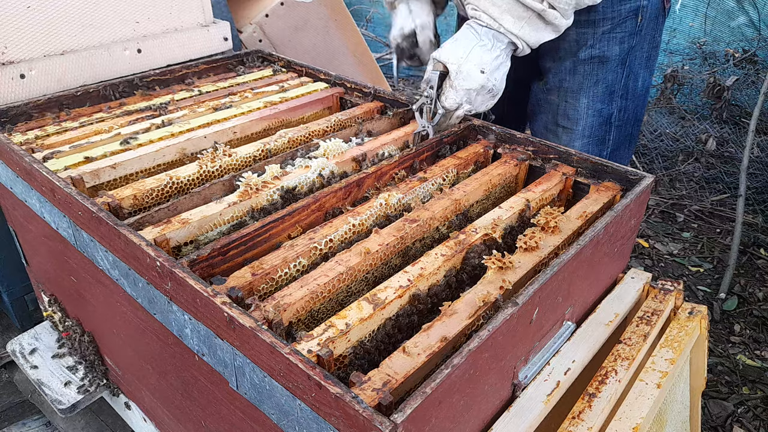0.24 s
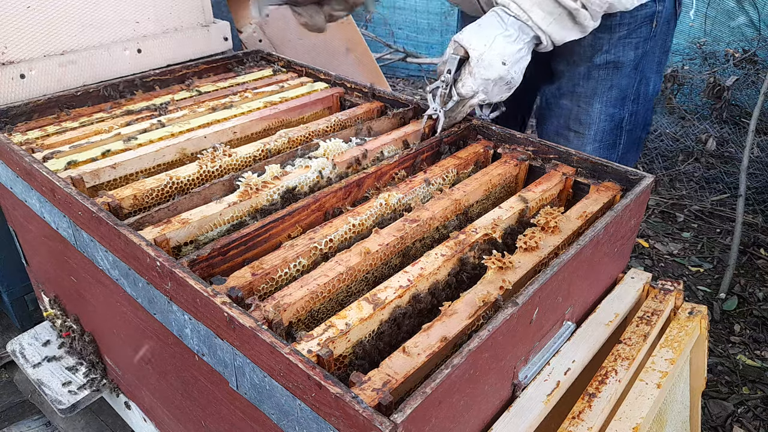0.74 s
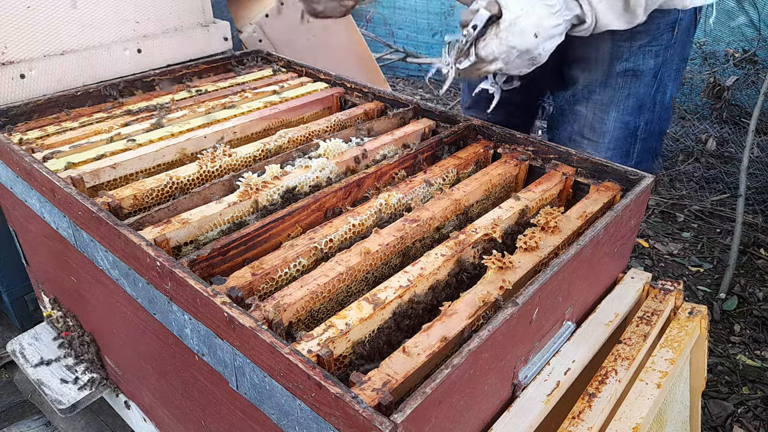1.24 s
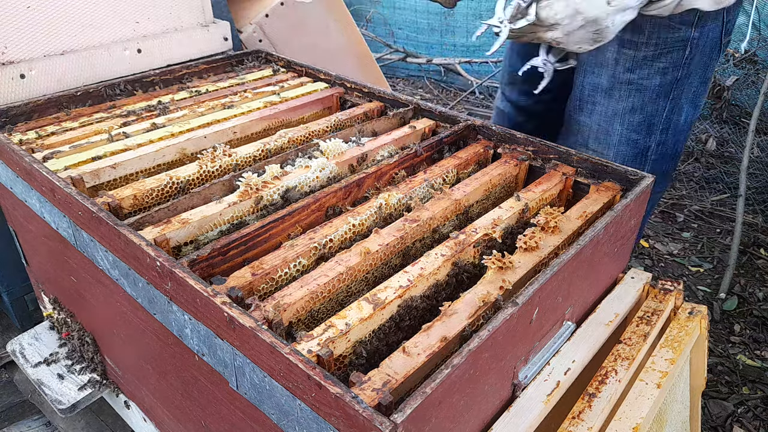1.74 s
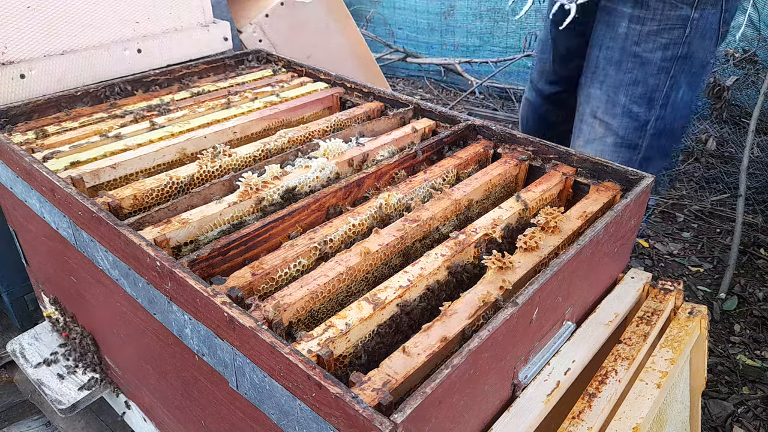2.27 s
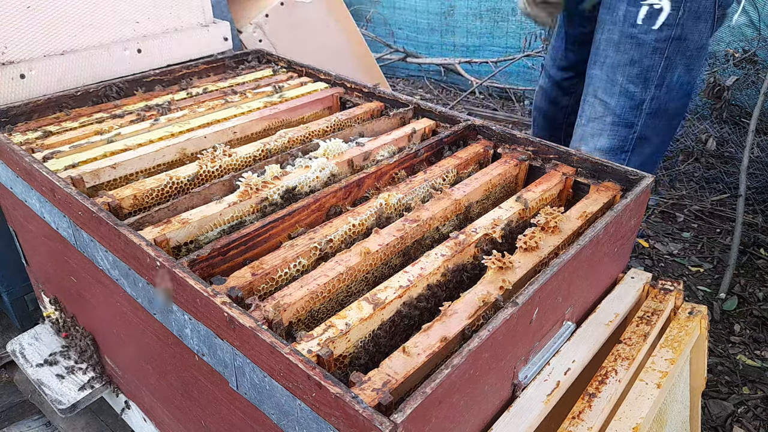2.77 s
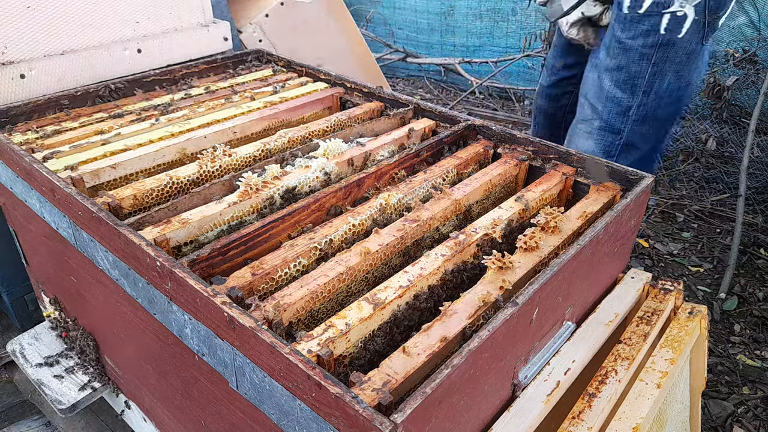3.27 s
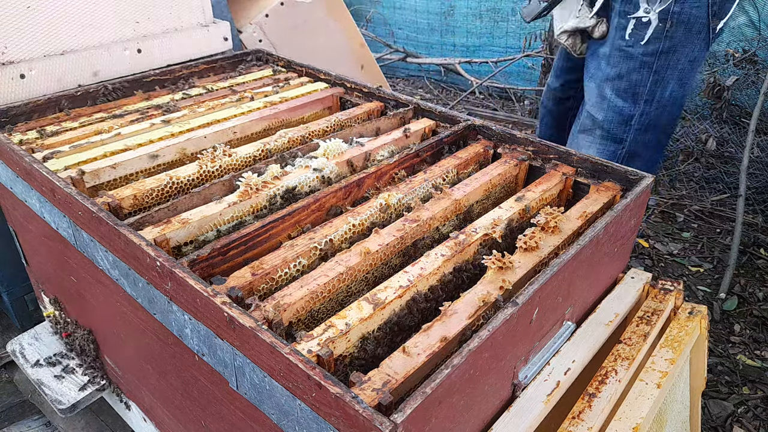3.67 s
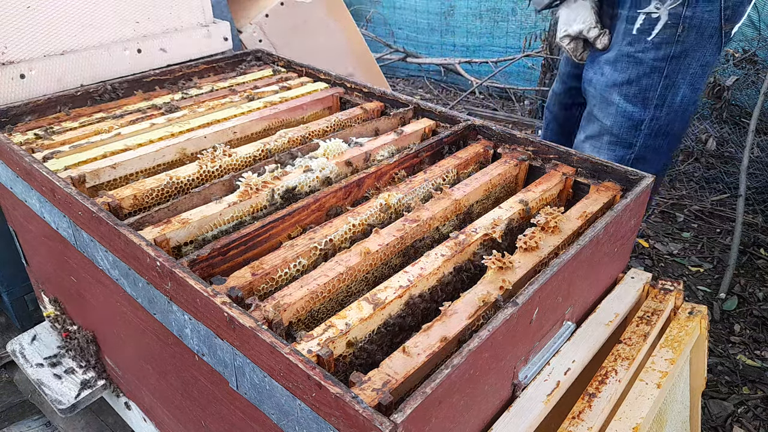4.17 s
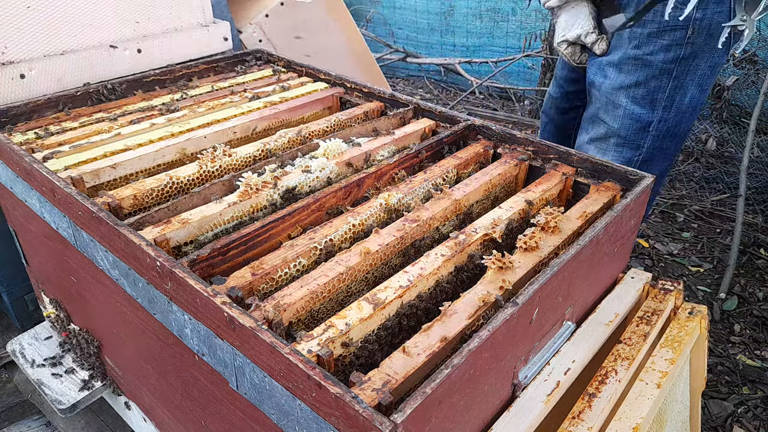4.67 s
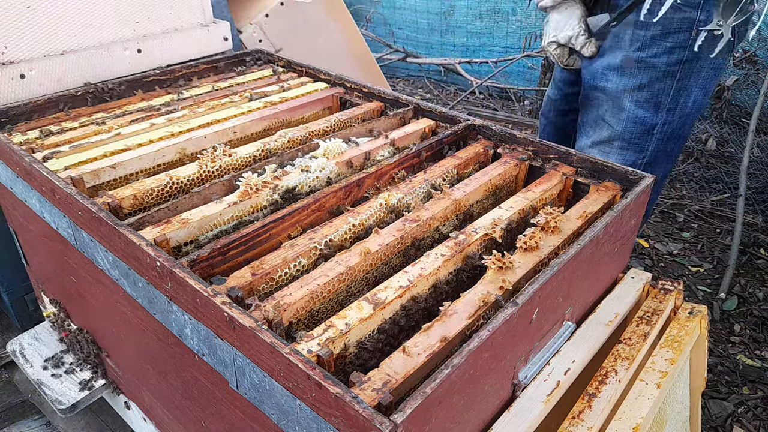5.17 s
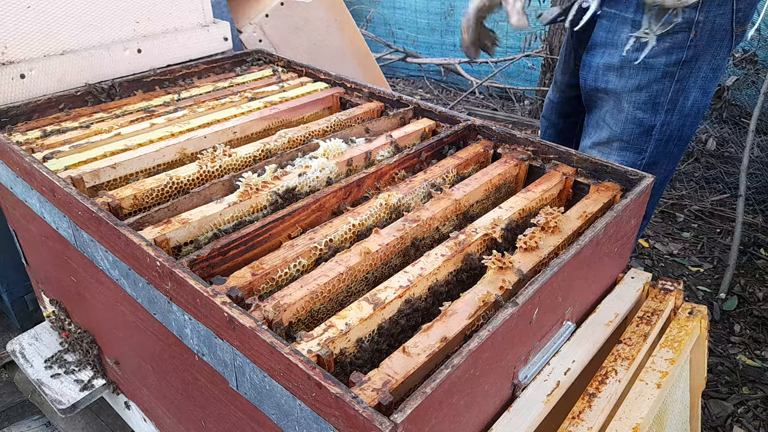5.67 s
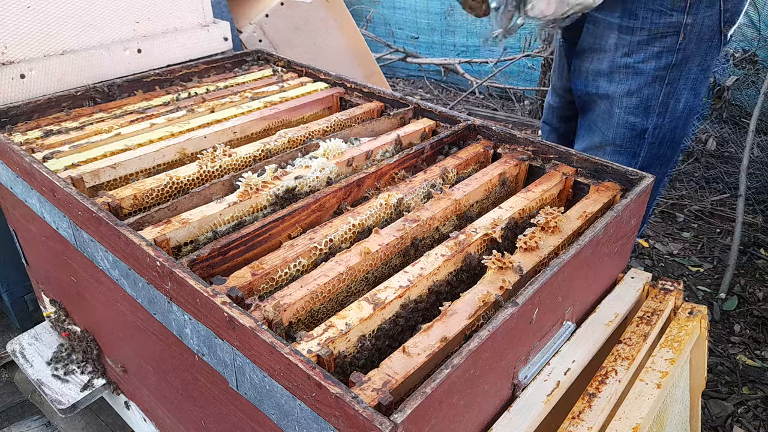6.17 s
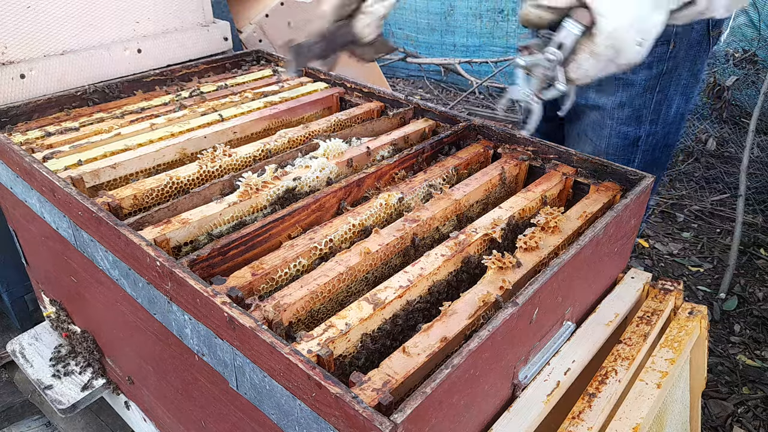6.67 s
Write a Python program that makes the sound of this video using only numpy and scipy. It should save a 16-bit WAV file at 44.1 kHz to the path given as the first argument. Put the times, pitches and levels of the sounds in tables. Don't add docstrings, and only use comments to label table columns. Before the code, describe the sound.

Bees hum steadily around an open hive outdoors while tools click on wood; one bee buzzes loudly against the left microphone, thudding, then leaves.

```python
import sys
import numpy as np
from scipy import signal
from scipy.fft import rfft, irfft, next_fast_len
from scipy.io import wavfile

SR = 44100
rng = np.random.default_rng(int(sys.argv[2]) if len(sys.argv) > 2 else 0)


def store_wav(level_fs):
    pcm = np.round(np.clip(np.atleast_2d(level_fs), -1, 1) * 32767)
    wavfile.write(sys.argv[1], SR, pcm.T.astype(np.int16))


def to_linear_factor(level_db):
    exponent = np.asarray(level_db, float) / 20
    return 10 ** exponent


N = 305392
TIME = np.arange(N) / SR
DRIFT_STEP = 64

# frequency in Hz, level in dB.
PORT_COLOUR = [(300, -12), (1500, 1), (5000, -2.5), (6500, -7), (8200, -22.5), (12500, -7.5),
               (16000, -12.5)]


def rms_one(x):
    return x / np.sqrt(np.mean(x ** 2) + 1e-20)


def in_time(rows):
    s, *columns = np.transpose(rows)
    return [np.interp(TIME, s, c) for c in columns]


def on_log(points, at):
    hz, value = np.transpose(points)
    return np.interp(np.log(at), np.log(hz), value)


def colour(x, gain_at):
    size = next_fast_len(N)
    hz = np.arange(1, size // 2 + 2) * SR / size
    return irfft(rfft(x, size) * gain_at(hz), size)[..., :N]


def port_coloured(hz):
    return to_linear_factor(on_log(PORT_COLOUR, hz))


def butter(x, order, hz, kind):
    return signal.sosfilt(signal.butter(order, hz, kind, fs=SR, output="sos"), x)


def drift(rate_hz, count):
    r = np.exp(-2 * np.pi * DRIFT_STEP * rate_hz / SR)
    white = rng.standard_normal((count, N // DRIFT_STEP + 1002))
    slow = signal.lfilter([1], [1, -2 * r, r * r], white)[:, 1000:]
    return slow / slow.std(axis=1, keepdims=True)


def stepped(rate_hz):
    return np.repeat(drift(rate_hz, count=1)[0], DRIFT_STEP)[:N]


def held(rows, rise_db_s, fall_db_s):
    total = 0
    for s, length, db in rows:
        before = np.maximum(s - TIME, 0)
        after = np.maximum(TIME - s - length, 0)
        total = total + to_linear_factor(db - rise_db_s * before - fall_db_s * after)
    return total


def air():
    # frequency in Hz, level in dB per Hz.
    hiss = [(20, -47), (40, -19), (70, -16.5), (140, -14.5), (320, -11.5), (700, -16.5), (1400, -16),
            (2100, -23.5), (4500, -26), (6400, -29), (8000, -44), (13000, -29.5), (16000, -36.5)]
    # frequency in Hz, left-right likeness (1 is the same).
    likeness = [(60, 0.3), (180, 0.86), (550, 0.95), (1650, -0.13), (4970, -1.4), (15000, -0.01)]

    def alike(hz):
        return np.clip(on_log(likeness, hz), -.95, .95)

    mid, side = rng.standard_normal((2, N))
    mid = colour(mid, lambda hz: to_linear_factor(on_log(hiss, hz)) * np.sqrt(1 + alike(hz)))
    side = colour(side, lambda hz: to_linear_factor(on_log(hiss, hz)) * np.sqrt(1 - alike(hz)))
    return to_linear_factor(-57.5) * rms_one(np.array([mid + side, mid - side]))


def birds():
    # start in seconds, first pitch in Hz, last pitch in Hz, level in dB.
    chirps = [(0, 4770, 4500, -61.5), (.005, 3420, 3200, -63.5), (0.253, 4075, 3900, -61),
              (0.299, 3950, 3770, -58), (0.585, 4070, 3750, -61), (0.638, 3100, 2960, -65),
              (0.766, 4230, 3680, -55), (.82, 3460, 3380, -61.5), (1.112, 4320, 5150, -55.5),
              (1.144, 3890, 3320, -53), (1.359, 3900, 3970, -59), (1.5, 3950, 3630, -57),
              (1.555, 3500, 3300, -60.5), (1.599, 3250, 3030, -57), (2.776, 4170, 3806, -64),
              (2.841, 2990, 3110, -61), (2.905, 4900, 3150, -62), (3.02, 3107, 2810, -64),
              (5.08, 4100, 3380, -68), (4.039, 4060, 3510, -59), (4.102, 5700, 4570, -66),
              (4.104, 4980, 3900, -57.5), (4.141, 3470, 3160, -60.5), (4.505, 4250, 3400, -60),
              (4.665, 3670, 3330, -60.5), (4.771, 4850, 4290, -58.5), (4.805, 3500, 3250, -60),
              (5.401, 4850, 3800, -62), (6.115, 4910, 3160, -60.5), (6.619, 4630, 3380, -57.5)]
    note_s, echo_t60_s = 0.044, 0.35
    part = np.linspace(0, 1, int(note_s * SR))
    direct = np.zeros(N + SR)
    for s, from_hz, to_hz, level_db in chirps:
        at = int(s * SR)
        glide = 2 * np.pi * np.cumsum(from_hz + (to_hz - from_hz) * part) / SR
        direct[at:at + part.size] += to_linear_factor(level_db + 3.0) * np.sin(np.pi * part) * np.sin(glide)
    hoarse = rms_one(butter(rng.standard_normal(N), 2, 380, "low"))
    direct = direct[:N] * (.7 + .7 * hoarse)
    echoes = rng.standard_normal((2, 12000)) * to_linear_factor(-60 * TIME[:12000] / echo_t60_s)
    echoes /= np.linalg.norm(echoes, axis=1, keepdims=True)
    return .5 * direct + signal.fftconvolve(direct[None], echoes, axes=1)[:, :N]


def swarm(count=44, centre_hz=228, spread=.11, wander=.025, come_and_go_db=6.0):
    # multiple of the wing beat, level in dB.
    voice = [(1, -8.5), (2, -0.5), (3, -10), (4, -13.5), (5, -10), (6, -12), (7, -19.5), (8, -27)]
    steps = np.arange(N // 8 + 1) * 8 / DRIFT_STEP
    cycle = np.linspace(0, 1, 257)
    pitch, near = drift(2.5, count), drift(6.0, count)
    tunes = np.sinh(np.linspace(-1.4, 1.4, count))
    sides = rng.uniform(-1, 1, count)
    out = np.zeros((2, steps.size))
    for k, (tune, side) in enumerate(zip(tunes, sides)):
        shape = sum(to_linear_factor(db) * np.sin(2 * np.pi * (m * cycle + rng.random())) for m, db in voice)
        wandering = wander * np.interp(steps, np.arange(pitch[k].size), pitch[k])
        turns = np.cumsum(centre_hz * np.exp(spread * tune + wandering)) * 8 / SR
        gain = to_linear_factor(come_and_go_db * np.interp(steps, np.arange(near[k].size), near[k]))
        lag = centre_hz * 0.00015 * side
        ports = np.interp([turns % 1, (turns - lag) % 1], cycle, shape)
        out += gain * ports * to_linear_factor([[4 * side], [-4 * side]])
    return rms_one(signal.resample_poly(out, 8, 1, axis=1)[:, :N])


def hive_hum():
    # time in seconds, loudness in dB, share of close fliers as deep partial in dB.
    activity = [(0, -60.5, 8.5), (.5, -54.5, 1.5), (1.0, -56, 3.5), (1.55, -53.5, 1), (1.8, -50, 5.5),
                (1.98, -47.5, 8), (2.05, -57.5, -1), (2.8, -57, -3), (3.4, -55, -17), (3.75, -56.5, 0),
                (4.6, -54, -0.3), (5.15, -55.5, -0.5), (5.7, -56.5, 3), (6.1, -54, .6), (6.5, -55, 5.5),
                (6.93, -51.5, -9)]
    loud_db, deep_db = in_time(activity)
    hum = swarm()
    deep = colour(hum, lambda hz: 1 / (1 + (hz / 310) ** 8))
    return to_linear_factor(loud_db) * (hum + (to_linear_factor(deep_db) - 1) * deep)


def knocks():
    # start in seconds, left level in dB, right level in dB, mode in Hz, decay t60 in seconds.
    wood = [
        (.3676, -45, -44, 580, 0.06),
        (1.6806, -41, -28, 1620, 0.042),
        (2.2721, -30, -29.5, 1153, 0.067),
        (6.4736, -42, -42, 490, 0.064),
    ]
    out = np.zeros((2, N))
    for s, left_db, right_db, hz, t60 in wood:
        t = np.maximum(TIME - s, 0)
        out += to_linear_factor([[left_db], [right_db]]) * to_linear_factor(-60 * t / t60) * np.sin(2 * np.pi * hz * t)
    return out


def clicks(tail_db=-16, tail_t60=0.12):
    # start in seconds, peak in dB, ring in Hz, decay t60 in seconds, treble in dB.
    contacts = [(0.357, -40.5, 1070, .019, -18), (0.368, -37.5, 1150, 0.02, -10),
                (0.4328, -36.5, 1210, 0.015, -13), (0.469, -38.5, 1130, 0.011, -12),
                (0.561, -40, 2400, 0.019, -18), (1.6821, -21.5, 1580, 0.0099, -14.5),
                (2.2712, -27, 2324, 0.073, -12.5), (2.325, -40, 1130, 0.027, -25),
                (6.326, -50, 1480, 0.03, -30.5), (6.4175, -27, 1940, 0.034, -7.5),
                (6.4317, -26, 5310, 0.026, -12), (6.4432, -51, 4500, 0.02, -2),
                (6.4715, -22, 5100, 0.021, -2), (6.547, -38.5, 5530, 0.011, 1)]
    # start in seconds, held time in seconds, level in dB.
    sliding = [
        (6.06, .06, -69),
        (6.345, .17, -55),
    ]
    length = 6000
    out, t = np.zeros((2, N + length)), TIME[:length]
    white = rng.standard_normal((2, N))
    body = rms_one(colour(white, lambda hz: port_coloured(hz) * (hz < 8200)))
    treble = rms_one(colour(white, lambda hz: port_coloured(hz) * (hz >= 8200)))
    for s, peak_db, ring_hz, t60, treble_db in contacts:
        at = int(s * SR)
        span = slice(at, at + length)
        fall = to_linear_factor(-60 * (t / t60) ** 1.6) + to_linear_factor(tail_db - 60 * t / tail_t60)
        fall *= np.minimum(t / 0.0006, 1)
        rattle = (body[:, span] + to_linear_factor(treble_db + 5.5) * treble[:, span]) * fall
        ring = to_linear_factor(-1) * np.sin(2 * np.pi * ring_hz * t) * to_linear_factor(-60 * t / (1.6 * t60))
        out[:, span] += to_linear_factor(peak_db - 4.5) * (0.44 * rattle + ring)
    grit = to_linear_factor(stepped(88.0))
    slide = held(sliding, rise_db_s=500, fall_db_s=220) * grit * (body + .2 * treble)
    return out[:, :N] + slide


def upper_partials(phase, near_db):
    # multiple of the wing beat, level in dB.
    stroke = [(3, 6), (5, 0.5), (8, -6), (10, -11), (14, -25.5), (18, -32), (28, -40)]
    fifth_db = 2 - 0.27 * near_db
    total = 0
    for k, slow in zip(range(3, 29), drift(14.0, count=26)):
        level = to_linear_factor(on_log(stroke, k) + (k == 5) * fifth_db)
        shimmer = np.interp(TIME * SR / DRIFT_STEP, np.arange(slow.size), to_linear_factor(3.0 * slow))
        total = total + level * shimmer * np.sin(k * phase + .035 * k * k)
    return total


def wing_slap(turns, near_db, sharp_db):
    # start in seconds, held time in seconds, level in dB.
    strikes = [
        (2.011, .008, -40),
        (2.035, 0.074, -53),
        (2.125, 0.0226, -47.5),
        (2.421, 0.017, -22),
        (2.442, 0.0086, -30),
    ]
    slap_drop_s = 2.45
    slap_db = -53 + 0.16 * near_db + 0.32 * sharp_db
    slap_db = slap_db - 9.5 * np.clip((TIME - slap_drop_s) / 0.015, 0, 1)
    slap_db = slap_db - 25.5 * np.maximum(TIME - slap_drop_s, 0)
    strength = to_linear_factor(1.3 * rng.standard_normal(2000))[turns.astype(int)]
    striking = held(strikes, rise_db_s=3500.5, fall_db_s=3999.5)
    bursts = strength * np.exp(-2.8 * (turns % 1)) * rng.standard_normal(N)
    slap = (to_linear_factor(slap_db - 2.5) + to_linear_factor(-11.5) * striking) * rms_one(colour(bursts, port_coloured))
    cracks = strength * np.exp(-11 * (turns % 1)) * rng.standard_normal(N)
    cracks = butter(cracks, 1, [800, 4200], "band")
    cracks = signal.sosfilt(signal.cheby2(4, 40, 7400, fs=SR, output="sos"), cracks)
    return slap + striking * rms_one(cracks)


def downwash(near_db):
    # start in seconds, held time in seconds, level in dB.
    gusts = [
        (2.013, .004, -24),
        (2.152, 0.0073, -21.5),
        (2.43, 0.012, -26),
    ]
    rumble = rms_one(butter(rng.standard_normal(N), 3, [65, 170], "band"))
    swirl = rms_one(butter(rng.standard_normal(N), 2, [200, 750], "band"))
    wash_db = -48 + 1.1 * near_db
    gain = to_linear_factor(wash_db - 3.0) + to_linear_factor(-5.0) * held(gusts, rise_db_s=1201, fall_db_s=700.5)
    return gain * (rumble + 1.1 * swirl)


def body_bumps():
    # start in seconds, peak in dB, thud in Hz, decay t60 in seconds.
    bumps = [
        (2.013, -16.5, 119.2, 0.047),
        (2.156, 1.5, 107, 0.032),
        (2.42, -21, 130, 0.049),
        (2.45, -24, 69.92, 0.074),
    ]
    out = np.zeros(N)
    for s, peak_db, hz, t60 in bumps:
        t = np.maximum(TIME - s, 0)
        out += to_linear_factor(peak_db - 60 * t / t60) * np.sin(2 * np.pi * hz * t) * np.minimum(t * hz, 1)
    return out


def near_bee(wobble=.003, rough=.22):
    # time in seconds, wing beat in Hz, loudness in dB,
    # facing as first over second partial in dB, stroke sharpness in dB.
    approach = [(1.52, 231.8, -68, -11, -14), (1.65, 235.9, -55, -9, -2.5), (1.685, 224, -44, -11, 1.5),
                (1.718, 236.4, -48.5, 7, -3.5), (1.745, 214.8, -55, 0, -14), (1.785, 238.2, -49, -10, 3),
                (1.847, 203.6, -37, -21, 3.5), (1.887, 208.5, -42.5, -7.5, -1.5),
                (1.961, 220.2, -37.5, -18, -0.5)]
    first_brush = [(1.98, 217.9, -32, -7.5, 0), (1.998, 224.5, -31.5, -13, 0.5),
                   (2.016, 222.3, -9, 4, -4.5), (2.028, 219.8, -18.5, 4, -12), (2.042, 229.6, -18, 1, 1),
                   (2.054, 224.1, -21.5, -1, -5.5), (2.08, 209.8, -22.5, 6.5, -6.5),
                   (2.101, 208, -27, -5.5, -0.5)]
    second_brush = [(2.122, 226.5, -23.5, 2, 0.5), (2.138, 228.2, -22.5, -2, 1),
                    (2.157, 229.8, -21.5, -9, -8), (2.18, 214.3, -33, 17, -7),
                    (2.222, 210.3, -40.5, -11, -1.5), (2.271, 215.1, -41, 5, -5),
                    (2.321, 221.5, -43, -26, -0.5), (2.372, 227.6, -44, -9, 0.5)]
    third_brush = [(2.403, 234.3, -17.5, 5, -12.5), (2.416, 228.1, -8.5, 15, -6),
                   (2.43, 240.7, -14, -16, 7), (2.436, 217.1, -15.5, 16, 6), (2.446, 209.2, -21.5, -10, 8),
                   (2.455, 207.5, -23.5, -7, 4), (2.464, 210.6, -37, -1, -9), (2.5, 217.7, -40, 6.5, -4.5)]
    leaving = [(2.562, 223.1, -54.5, 5.5, -2.5), (2.613, 221.3, -48, 5, -13), (2.653, 217.8, -73.5, 1, -1),
               (2.713, 207.3, -66.5, 2, -12), (2.76, 222, -81.5, -10, -2), (2.95, 210.4, -75.5, -16, 1),
               (3.1, 208, -74, -9.5, 1), (3.166, 220.6, -64.5, 7, 1), (3.201, 219.2, -75, 12, -8)]
    flight = approach + first_brush + second_brush + third_brush + leaving
    beat_hz, loud_db, facing_db, sharp_db = in_time(flight)
    second_db = loud_db - 10 * np.log10(1 + to_linear_factor(2 * facing_db))
    first_db = second_db + facing_db
    near_db = loud_db + 30
    turns = np.cumsum(beat_hz * (1 + wobble * stepped(25.0))) / SR
    phase = 2 * np.pi * turns

    eddies = rms_one(butter(rng.standard_normal(N), 2, [30, 300], "band"))
    tone = to_linear_factor(first_db) * np.sin(phase) + to_linear_factor(second_db) * np.sin(2 * phase + 0.72)
    tone = np.sqrt(2) * tone * (1 + 0.37 * rough * eddies)
    upper = rms_one(upper_partials(phase, near_db) * (1 + rough * eddies))
    upper = to_linear_factor(-32 + near_db + sharp_db) * upper
    out = tone + upper + wing_slap(turns, near_db, sharp_db) + downwash(near_db) + body_bumps()
    out = butter(out, 3, 70, "high")
    return 2 * out * np.interp(TIME, [1.45, 1.55, 3.2, 3.26], [0, 1, 1, 0])


def gain_control():
    rest_db, duck_db = -2, -11.5
    duck_s, attack_s, hold_until_s, recover_s = 2.41, .03, 3.47, 0.53
    duck = np.clip((TIME - duck_s) / attack_s, 0, 1)
    recovery = np.exp(-np.maximum(TIME - hold_until_s, 0) / recover_s)
    return rest_db + duck_db * duck * recovery


def scene():
    surroundings = to_linear_factor(gain_control() + 3) * (hive_hum() + air() + birds())
    return surroundings + clicks() + knocks() + near_bee() * to_linear_factor([[0], [-72]])


def band_limit(x):
    return signal.sosfilt(signal.butter(12, 16690, fs=SR, output="sos"), x)


def record(dry):
    # frequency in Hz, dB below the left port.
    shade = [(60, 1.5), (150, 2), (380, 3), (950, 4), (2380, 16), (5980, 31), (15000, 5.5)]
    right = colour(dry[1], lambda hz: to_linear_factor(-on_log(shade, hz)))
    shaded = np.array([dry[0], np.roll(right, 12)])
    limited = 1.053 * np.tanh(shaded / 1.119)
    cut = signal.sosfilt(signal.cheby2(12, 60, 16500, fs=SR, output="sos"), limited)
    return band_limit(cut)


dry = scene()
out = record(dry)
store_wav(out)
```